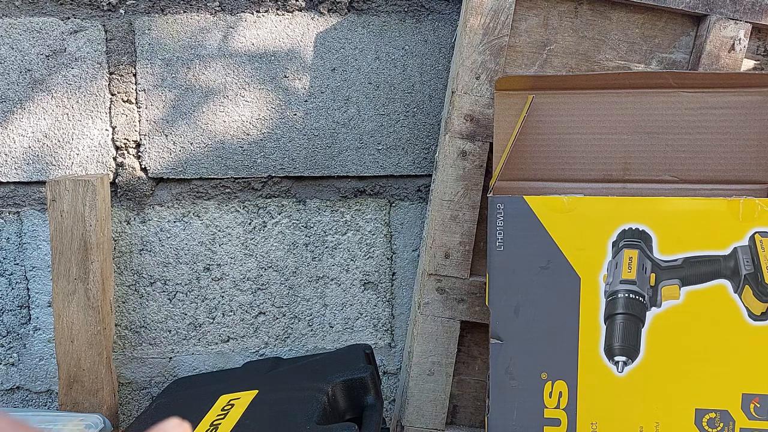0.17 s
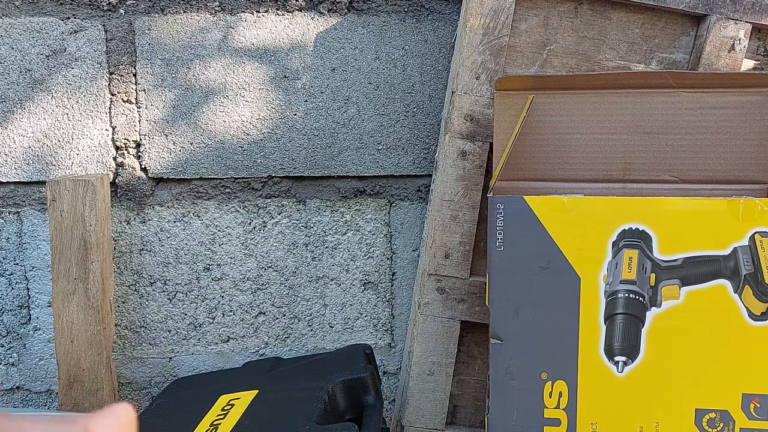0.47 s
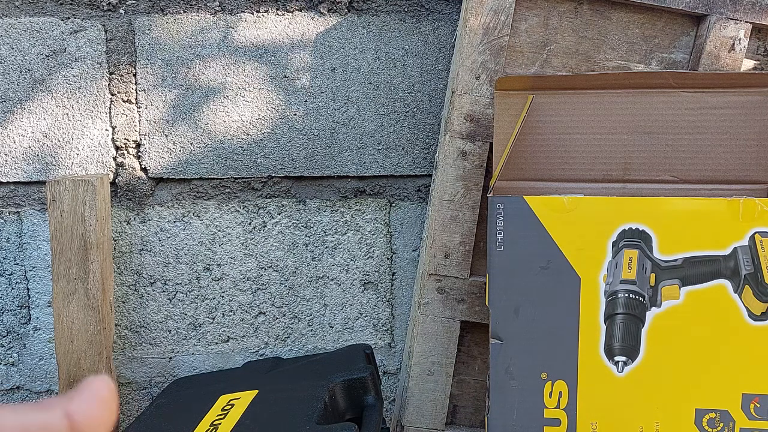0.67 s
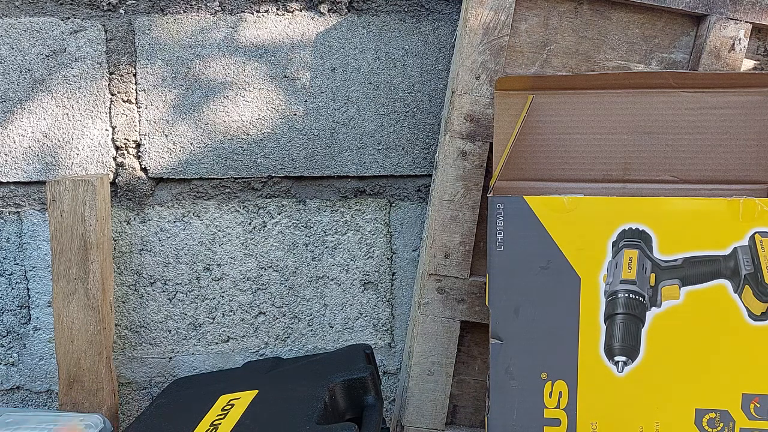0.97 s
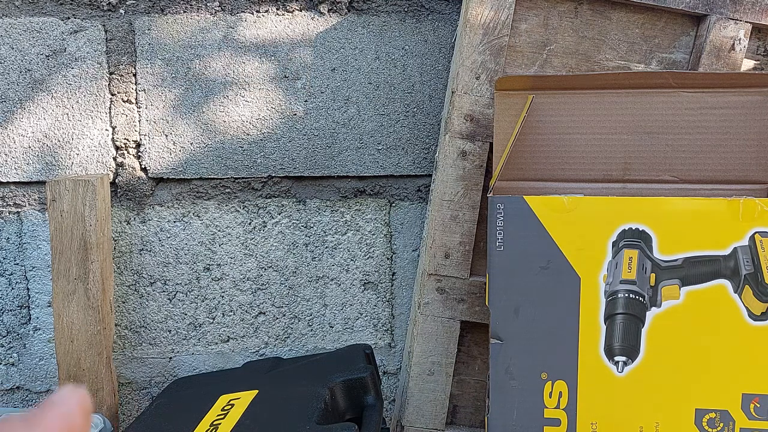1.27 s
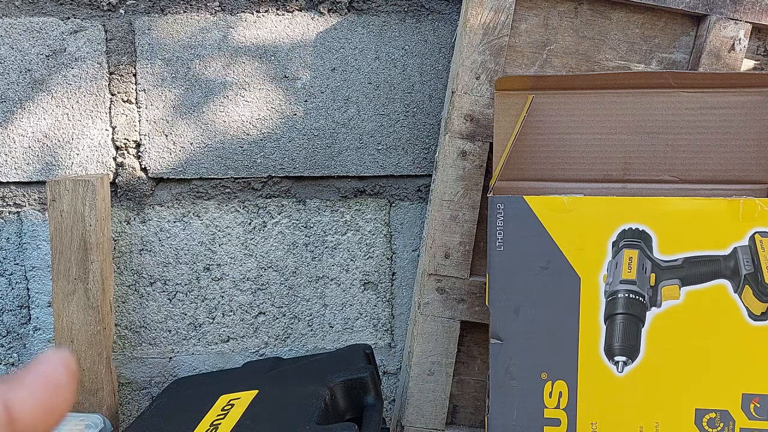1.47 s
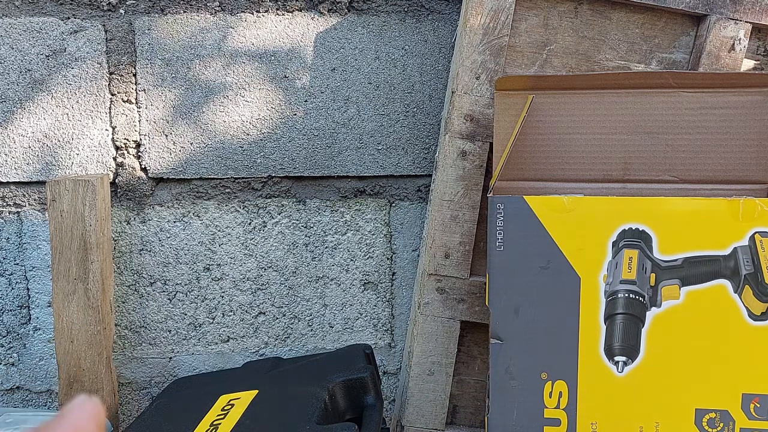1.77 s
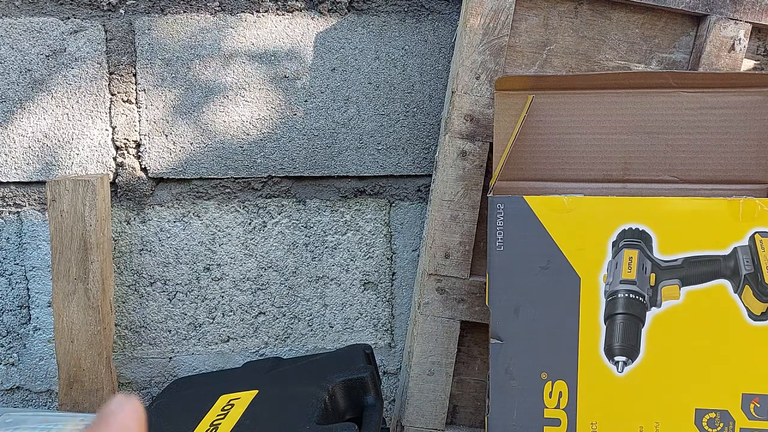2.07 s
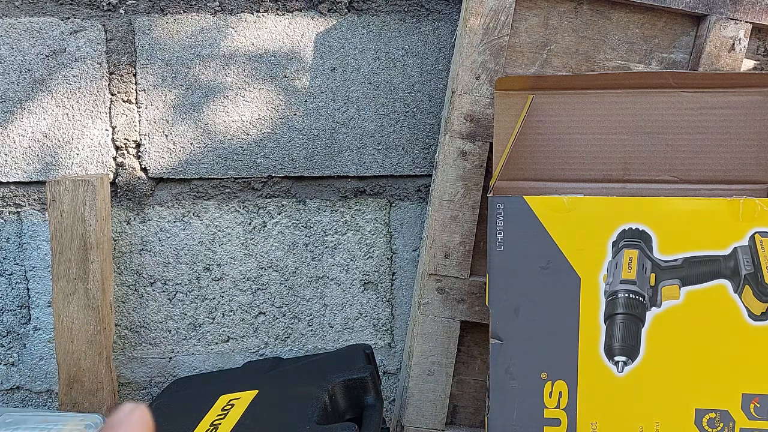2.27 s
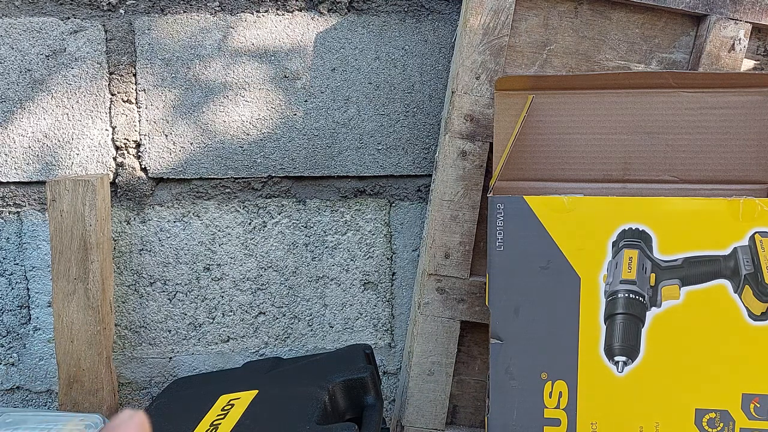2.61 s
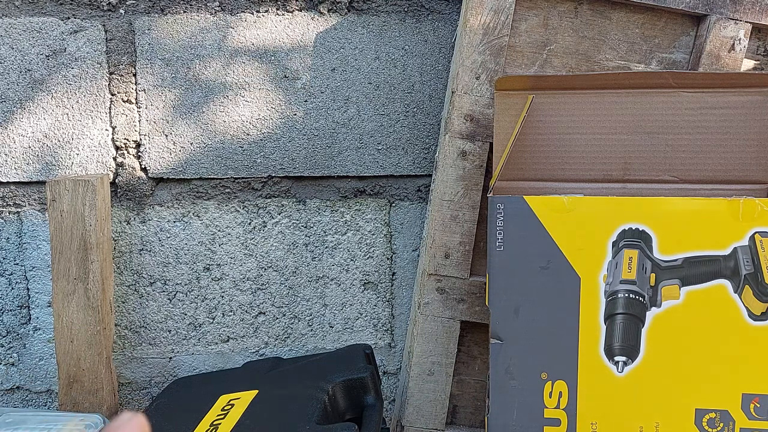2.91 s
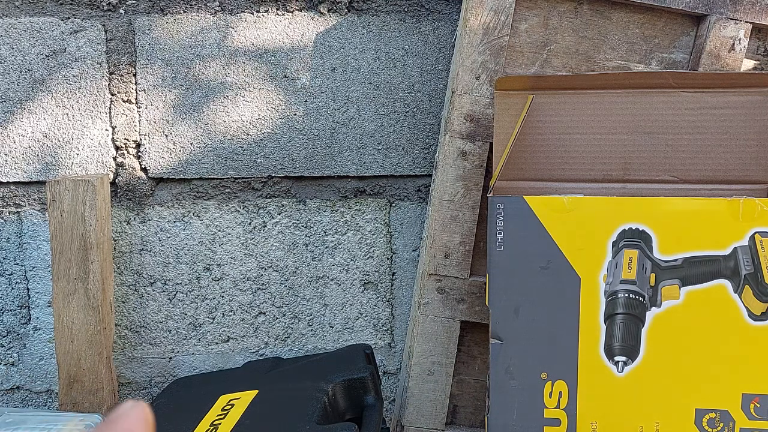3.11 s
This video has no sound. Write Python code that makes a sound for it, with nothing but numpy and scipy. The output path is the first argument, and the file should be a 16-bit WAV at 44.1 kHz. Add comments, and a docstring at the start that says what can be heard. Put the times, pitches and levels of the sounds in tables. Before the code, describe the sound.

A cordless drill whirrs in three short bursts, close on the left. Its chuck clacks sharply at starts and stops and clicks between them. Faint insects and a low rumble lie behind, outdoors by a wall.

```python
"""A cordless drill spins its keyless chuck in three short bursts, close on the left, by a block wall.
Its gears whirr, its speed control whines and its motor brushes spit sparks. The chuck's lock clacks
at starts and stops and clicks when twisted between them. Fingers rub the grip, and the wall echoes.
Behind it are insects, a low rumble, a soft hiss, a thin chirp and a faint, far animal call."""
import sys
import numpy as np
from scipy import signal
from scipy.fft import rfft, irfft, next_fast_len
from scipy.io import wavfile
from scipy.ndimage import map_coordinates

SR = 44100
rng = np.random.default_rng(int(sys.argv[2]) if len(sys.argv) > 2 else 0)


def wav_out(sig):
    """Save sig, one row per channel (or a flat mono array), as 16-bit PCM at SR to the path in sys.argv[1]."""
    wavfile.write(sys.argv[1], SR, np.round(np.clip(np.atleast_2d(sig).T, -1, 1) * 32767).astype(np.int16))


N = 143325

# The background. Each row: time in seconds, then dB of low insects, high insects, rumble and hiss.
BACKGROUND = [(0, -82, -68, -63, -68.5), (.7, -94.5, -67.5, -64, -76.5), (1.08, -83, -66, -61.5, -74),
              (1.2, -59.5, -58.5, -55, -63.5), (1.5, -67.5, -66, -58, -63), (1.8, -61, -63.5, -57, -64),
              (1.9, -69.5, -64, -59, -73), (2.15, -64.5, -62, -56.5, -61),
              (2.42, -65.5, -64.5, -58.5, -64.5), (2.58, -62, -60, -56, -68.5),
              (2.8, -57.5, -58, -50.5, -75.5), (2.93, -78, -58, -47.5, -50.5),
              (3.25, -68, -60, -47.5, -64.5)]
# The tone of the rumble and of the hiss. Each row: frequency in Hz, level in dB.
RUMBLE_SHAPE = [(20, -33.5), (32, -23.5), (45, -4.5), (72, -0.5), (160, -10), (260, -18), (400, -28.5),
                (700, -40.5), (1500, -50), (4000, -79)]
HISS_SHAPE = [(200, -6.5), (700, -2), (1200, -9), (2200, -2), (4200, -0.5), (6300, 1), (7700, 5.5),
              (9500, 0.5), (13000, 0.5), (16000, -3)]
# Two animal voices. Each row: time in seconds, pitch in Hz, level in dB.
CHIRP_PATH = [(1.53, 4810, -80), (1.575, 5460, -56), (1.605, 6710, -59), (1.631, 7730, -47.5),
              (1.675, 7320, -44.5), (1.695, 5640, -64), (1.72, 4300, -58)]
CALL_PATH = [(0, 1604, -80), (.12, 1575, -79), (.23, 1560, -72.5), (.32, 1555, -71.5), (.62, 1543, -86.5),
             (.73, 1490, -88), (.8, 1480, -95)]
# Finger rubs. Each row: middle and half length in seconds, level in dB, centre in Hz.
FINGER_RUBS = [(1.174, 0.011, -57.5, 2760), (1.432, 0.021, -60, 834), (1.564, 0.01, -57, 2230),
               (1.813, 0.042, -67.5, 2770), (2.017, 0.052, -73.5, 2260), (2.364, .06, -65.5, 3670),
               (2.93, 0.014, -49, 1000)]
# The ringing of the grip and of the lock. Each row: pitch in Hz, level in dB, seconds to fade 60 dB.
GRIP_RING = [(288, 8.5, 0.043), (462, 1, 0.051), (620, -16, 0.18)]
LOCK_RING = [(777, -12.5, 0.014), (1610, -4, 0.0067), (2943, 1, 0.007), (3420, -6.5, 0.0078)]
# Whines of the speed control. Each row: start and end in seconds, level in dB.
WHINE_TIMES = [(0.312, .4, -56), (1.198, 1.23, -57.5), (2.944, 3.054, -51.5)]
# Sparks at the brushes. Each row: time in seconds, level in dB, centre in Hz.
BRUSH_SPARKS = [(0.345, -25, 14530), (0.3847, -23, 14170), (0.4275, -18, 14300), (0.461, -15, 15070),
                (.502, -25.5, 14530), (1.257, -20, 11700), (1.274, -16, 12120), (1.35, -14.5, 14800),
                (1.36, -16, 14650), (1.367, -24.5, 12810), (3.087, -19.5, 9000), (3.094, -20, 9430)]
# Lock clacks. Each row: time in seconds, level in dB, then extra dB for treble, bass and right side.
LOCK_CLACKS = [(.2853, -42, -0.5, -3.5, -0.5), (.518, -11, 0.5, 3.5, -5.5), (.5325, -18, -11, -3, -5.5),
               (.541, -16.5, -12.5, 1, -4.5), (.5605, -37, -2, 9, -5.5), (.805, -48.5, -7.5, 4.5, 2),
               (.831, -42, 2, 9, -16), (.845, -33, 1.5, 4.5, -3), (.8705, -28, 3.5, 6, -3),
               (1.2055, -9.5, -1.5, -19.5, -9), (1.216, -9, -9.5, -8, -7), (1.3625, -13.5, -5, 0, -2.5),
               (1.603, -26, 1.5, -14, -2.5), (1.639, -21, 2.5, 1.5, -6), (1.7105, -33.5, -9.5, -25, 2),
               (2.921, -34.5, -7.5, -2, 3.5), (2.9675, -7.5, -7, -9.5, -7.5), (2.9835, -8.5, -9, -3.5, 0),
               (3.204, -6.5, -8, 1.5, -1.5)]
# The tone of the lock's crack and of the drill's housing. Each row: frequency in Hz, level in dB.
CRACK_SHAPE = [(100, -33), (400, -10.5), (750, -14.5), (1100, -9), (1600, -2), (2300, -5.5), (3000, -10),
               (3700, -1.5), (4500, -8.5), (6000, -8.5), (8500, -12), (12000, -11.5), (15000, -9)]
HOUSING_SHAPE = [(40, -21), (120, -11.5), (300, -14.5), (500, -12.5), (900, -14.5), (1200, -8),
                 (1550, -2.5), (2200, -6), (3000, -6), (3450, -7), (4000, -4.5), (4500, -7), (5400, -2),
                 (6200, -4.5), (6800, 0), (7700, -6.5), (8400, -8.5), (10000, -8.5), (12000, -5),
                 (13200, -6), (15000, -5)]
# How much weaker the gears are on the right. Each row: frequency in Hz, change in dB.
RIGHT_SHADE = [(100, -15.5), (300, -9), (700, -1.5), (1500, -4), (3000, -2.5), (4600, -2.5), (6200, -15),
               (7600, -5), (9500, -19), (12000, -7), (15000, -14)]
# How alike the gears sound on both sides. Each row: frequency in Hz, likeness from 0 to 1.
LIKENESS = [(100, 0.43), (1300, 0.86), (3000, .6), (6000, 0.37), (14000, 0.15)]
# Squealing and running gear tones. Each row: multiple of the motor's speed, level in dB.
SQUEAL_TONES = [(4, -42), (14, -37)]
GEAR_TONES = [(1, -20), (2, -26), (4, -19), (5, -21), (10, -25), (12, -22), (15, -17), (18, -16.5),
              (22, -21), (25, -16.5)]
# One list for each burst. Each row: time in seconds, motor turns per second, level in dB.
BURSTS = [
    [(.31, 60, -54.5), (.334, 150, -29), (.356, 230, -26.5), (.379, 285, -23.5), (.43, 312, -23),
     (.5, 340, -22.5), (.54, 200, -27.5), (.57, 60, -66.5)],
    [(1.198, 100, -44.5), (1.208, 180, -25), (1.24, 270, -21), (1.28, 315, -19), (1.31, 300, -20.5),
     (1.36, 240, -21.5), (1.378, 130, -33.5), (1.405, 95, -56)],
    [(2.958, 100, -43.5), (2.972, 170, -26), (3.0, 235, -22), (3.045, 291, -22.5), (3.088, 317, -19),
     (3.135, 293, -22.5), (3.18, 235, -21.5), (3.215, 77, -42.5), (3.25, 60, -68)],
]
# Each row colours one burst: bass in dB, gear tooth peak in dB, its centre in Hz, treble and tones in dB.
BURST_COLOURS = [(2.5, 1, 4700, 1.5, 2), (1, -1, 6300, 1.5, -4.5), (-6, 5.5, 5800, -4, -0.5)]

RIGHT_DELAY_S = 0.0003727
WALL_ECHO_DB, WALL_FADE_S = -17, 0.17


def amp(db):
    """Turn decibels into a number to multiply by."""
    return 10 ** (np.asarray(db) / 20)


def unit(x):
    """Scale a signal to an average power of 1."""
    return x / np.sqrt(np.mean(x ** 2) + 1e-20)


def along(points, hz):
    """Read between a table's rows, on a scale of octaves."""
    f, v = np.transpose(points)
    return np.interp(np.log(hz + 1), np.log(f + 1), v)


def clock():
    """The time of every sample, in seconds."""
    return np.arange(N) / SR


def curves(rows):
    """Join timed rows into one curve for each column after the time."""
    s, *cols = np.transpose(rows)
    return [np.interp(clock(), s, c) for c in cols]


def gate(start, end):
    """1 between two times, with soft edges."""
    return np.clip(np.minimum(clock() - start, end - clock()) / .005 + 1, 0, 1)


def wobble(rate):
    """A curve that slides to a new random value, rate times a second."""
    return map_coordinates(rng.standard_normal(N + 4), [clock() * rate], order=1)


def cycles(hz):
    """The growing angle (phase) of a wave whose pitch moves."""
    return 2 * np.pi * np.cumsum(hz) / SR


def bell(x, centre, width):
    """A smooth hump of height 1."""
    return np.exp(-.5 * ((x - centre) / width) ** 2)


def filtered(x, response):
    """Multiply each frequency f in x by response(f)."""
    m = next_fast_len(N + 8192)
    return irfft(rfft(x, m) * response(np.fft.rfftfreq(m, 1 / SR)), m)[..., :N]


def noise(response, channels=1):
    """Filtered noise with an average power of 1."""
    return unit(filtered(rng.standard_normal((channels, N)), response))


def ring(modes, t):
    """A struck part rings with fading tones, a little different each time."""
    return sum(amp(db + rng.normal(0, 2.0) - 60 * t / fade_s)
               * np.sin(2 * np.pi * hz * (1 + rng.normal(0, 0.027)) * t) for hz, db, fade_s in modes)


def late(x):
    """Sound from the left reaches the right side later."""
    return filtered(x, lambda f: np.exp(-2j * np.pi * f * RIGHT_DELAY_S))


def echo(x, fade_s):
    """A blurred echo, different on each side, that drops 60 dB in fade_s."""
    t = np.arange(SR // 2) / SR
    tail = rng.standard_normal((2, len(t))) * amp(-60 * t / fade_s)
    return signal.fftconvolve(x[None], tail / np.linalg.norm(tail[0]), axes=1)[:, :N]


def outdoors():
    """Low, pulsing insects and high, smooth ones over a distant rumble and a soft hiss."""
    low_db, high_db, rumble_db, hiss_db = curves(BACKGROUND)
    low_insects = amp(low_db + 4.5 * wobble(11)) * noise(lambda f: bell(f, 4867, 327), channels=2)
    high_insects = amp(high_db) * noise(lambda f: bell(f, 10980, 650), channels=2)
    mid, side = noise(lambda f: amp(along(RUMBLE_SHAPE, f)), channels=2)
    rumble = amp(rumble_db) * np.array([mid + 0.25 * side, 0.65 * (mid - 0.32 * side)])
    hiss = amp(hiss_db + wobble(17)) * noise(lambda f: amp(along(HISS_SHAPE, f)), channels=2)
    return low_insects + high_insects + rumble + hiss


def chirp():
    """A thin, echoing chirp, likely a small bird. Its fast-shaking pitch makes it raspy."""
    hz, db = curves(CHIRP_PATH)
    phase = cycles(hz + 463 * wobble(1500))
    tone = np.sin(phase) + amp(-6.5) * np.sin(2 * phase)
    voice = amp(db) * gate(CHIRP_PATH[0][0], CHIRP_PATH[-1][0]) * tone
    return voice + amp(-6) * echo(voice, fade_s=0.31)


def far_call():
    """A far animal holds a slowly sinking note, with a weaker tone an octave below."""
    hz, db = curves(CALL_PATH)
    phase = cycles(hz + 28 * wobble(300))
    tone = np.sin(phase) + amp(-15) * np.sin(phase / 2)
    return amp(db) * gate(CALL_PATH[0][0], CALL_PATH[-1][0]) * tone


def fingers():
    """Skin rubs on the grip in short, grainy strokes."""
    rubs = 0
    for s, half_s, db, hz in FINGER_RUBS:
        friction = noise(lambda f: bell(np.log2(f + 1), np.log2(hz), width=0.66), channels=2)
        rubs += amp(db) * bell(clock(), s, half_s) * friction
    grain = unit(amp(7 * wobble(350)))
    return rubs * grain


def grip_bump(start_s=1.409, rise_s=0.0013):
    """The drill settles in the hand with a soft, hollow knock."""
    t = np.maximum(clock() - start_s, 0)
    return amp([[-42], [-47]]) * ring(GRIP_RING, t) * (1 - np.exp(-t / rise_s))


def electrics(whine_hz=3850, spark_half_s=0.0012, spark_width_hz=880):
    """The speed control whines as the motor starts; the brushes spit short, bright sparks."""
    t = clock()
    whine = sum(amp(db) * np.sin(2 * np.pi * k * whine_hz * t)
                for k, db in enumerate([7, -1, -7.5, 0], start=1))
    left = whine * sum(amp(db) * gate(start, end) for start, end, db in WHINE_TIMES)
    thump = amp(-16) * noise(lambda f: bell(f, 170, 250))[0]
    for s, db, hz in BRUSH_SPARKS:
        fizz = noise(lambda f: 1 / (1 + ((f - hz) / spark_width_hz) ** 2))[0]
        left += amp(db) * bell(t, s, spark_half_s) * (fizz + thump)
    return np.array([left, amp(-21.5) * late(left)])


def chuck(rise_s=0.00072, crack_fade_s=0.0067, rattle_fade_s=0.072):
    """The lock in the chuck (the bit holder) clacks: a hard crack, a short ring and a brief rattle."""
    out = np.zeros((2, N + SR))
    t = np.arange(SR // 10) / SR
    lock_noise = noise(lambda f: amp(along(CRACK_SHAPE, f)), channels=2)
    treble = filtered(lock_noise, lambda f: 1 - 1 / (1 + (f / 5000) ** 4))
    bass_cut = signal.butter(1, 2000, 'high', fs=SR, output='sos')
    for k, (s, db, treble_db, bass_db, right_db) in enumerate(LOCK_CLACKS):
        at = slice(round(s * SR), round(s * SR) + len(t))
        fresh = slice(k * len(t), (k + 1) * len(t))  # new noise for each clack
        crack = lock_noise[:, fresh] + (amp(treble_db) - 1) * treble[:, fresh]
        blow = ring(LOCK_RING, t) + amp(6 - 60 * t / crack_fade_s) * crack[0]
        rattle = amp(-13 - 60 * t / rattle_fade_s) * crack
        clack = (blow + rattle) * (1 - np.exp(-t / rise_s))
        thin = signal.sosfilt(bass_cut, clack)
        out[:, at] += amp([[db], [db + right_db]]) * (thin + amp(bass_db) * (clack - thin))
    return np.array([out[0, :N], late(out[1, :N])])


def squeal():
    """The loaded gears sing a short rising note as the first burst spins up."""
    speed, _ = curves(BURSTS[0])
    angle = cycles(speed * (1 + .015 * wobble(500)))
    tones = sum(amp(db) * np.sin(round(k) * angle) for k, db in SQUEAL_TONES)
    left = bell(clock(), centre=.358, width=.016) * tones
    return np.array([left, amp(-4.5) * late(left)])


def gears(burst, colour, waver=.004, beat_depth=.3, rattle_db=1.57, flutter_db=2.5):
    """Gear teeth make tones and a noise that pulses with each motor turn, heard through the housing."""
    speed, level_db = curves(burst)
    bass_db, tooth_db, tooth_hz, treble_db, tones_db = colour
    angle = cycles(speed * (1 + waver * wobble(250)))
    grind = rng.standard_normal((2, N))
    grind *= unit((1 + beat_depth * np.cos(angle)) * amp(rattle_db * wobble(600)))
    tones = sum(amp(tones_db + db + flutter_db * wobble(70))
                * np.sin(round(k) * angle + rng.uniform(0, 2 * np.pi)) for k, db in GEAR_TONES)

    def housing(f):
        bass = bass_db / (1 + (f / 600) ** 4)
        treble = treble_db * (1 - 1 / (1 + (f / 9700) ** 10))
        teeth = tooth_db * bell(np.log2(f + 1), np.log2(tooth_hz), width=0.13)
        return unit(amp(along(HOUSING_SHAPE, f) + bass + treble + teeth))

    def right_blend(f):
        alike = np.clip(along(LIKENESS, f), 0, 1)
        return amp(along(RIGHT_SHADE, f)) * np.array([alike, np.sqrt(1 - alike ** 2)])

    loudness = amp(level_db) * gate(burst[0][0], burst[-1][0])
    left, other_grind = filtered(np.array([grind[0] + tones, grind[1]]), housing) * loudness
    # The right side mixes the delayed left sound with a grind of its own.
    right = filtered(np.array([late(left), other_grind]), right_blend).sum(0)
    return np.array([left, right])


def scene():
    """The drill, its echo off the wall and the yard around it."""
    whirr = sum(gears(burst, colour) for burst, colour in zip(BURSTS, BURST_COLOURS))
    drill = whirr + electrics() + chuck() + grip_bump() + fingers() + squeal()
    wall = amp(WALL_ECHO_DB) * echo(drill.mean(0), WALL_FADE_S)
    return drill + wall + chirp() + far_call() + outdoors()


def record(dry):
    """Cut the deep bass below 36 Hz and the treble above 15900 Hz."""
    return filtered(dry, lambda hz: (1 - 1 / (1 + (hz / 36) ** 6)) / (1 + (hz / 15900) ** 200))


dry = scene()
out = record(dry)
wav_out(out)
```